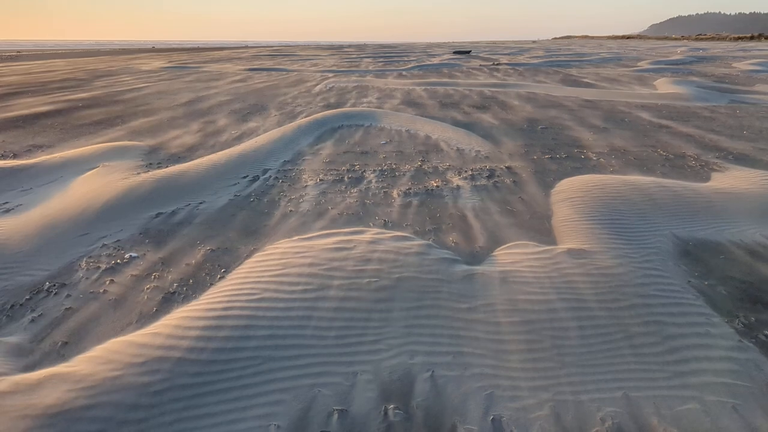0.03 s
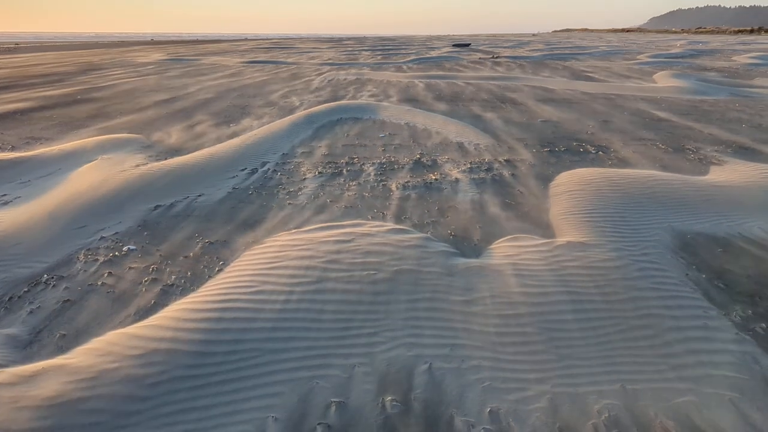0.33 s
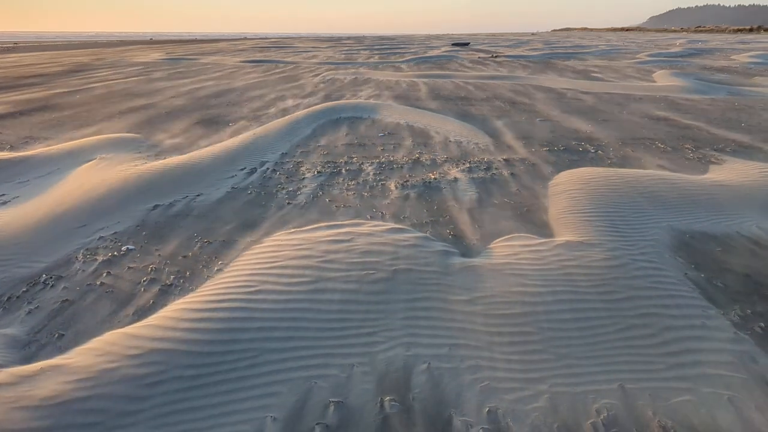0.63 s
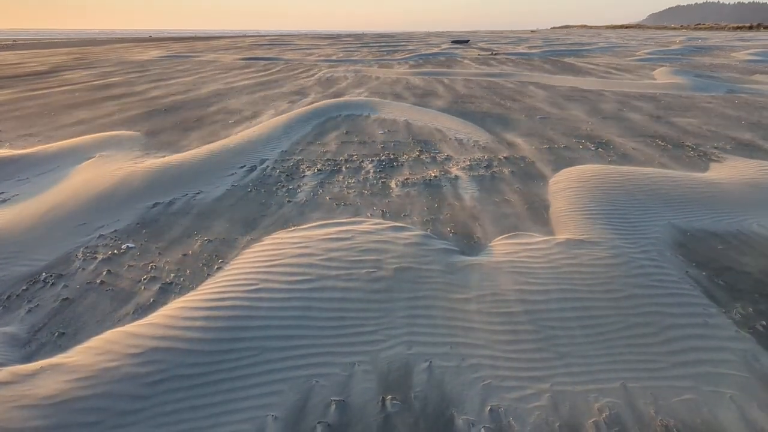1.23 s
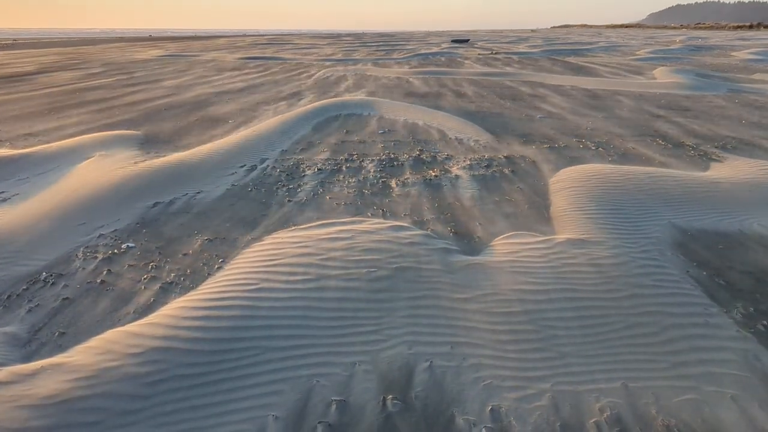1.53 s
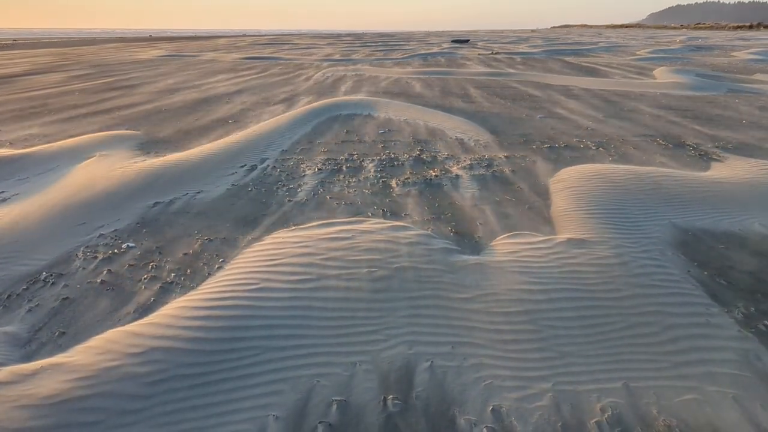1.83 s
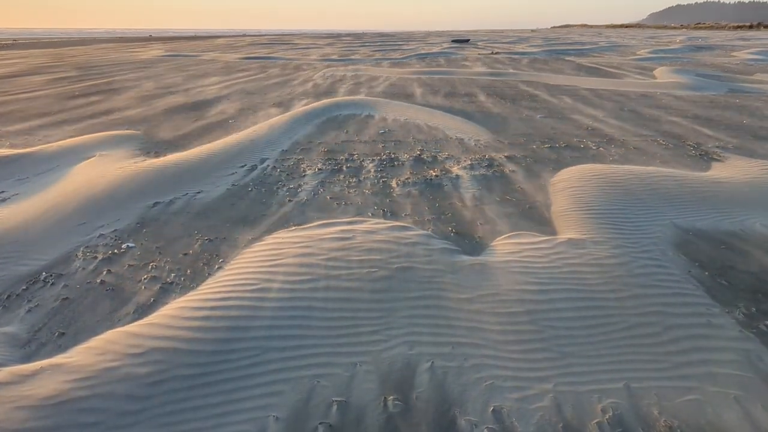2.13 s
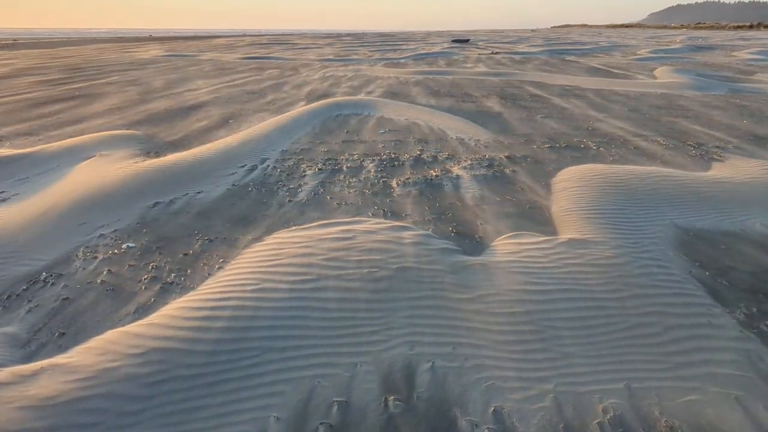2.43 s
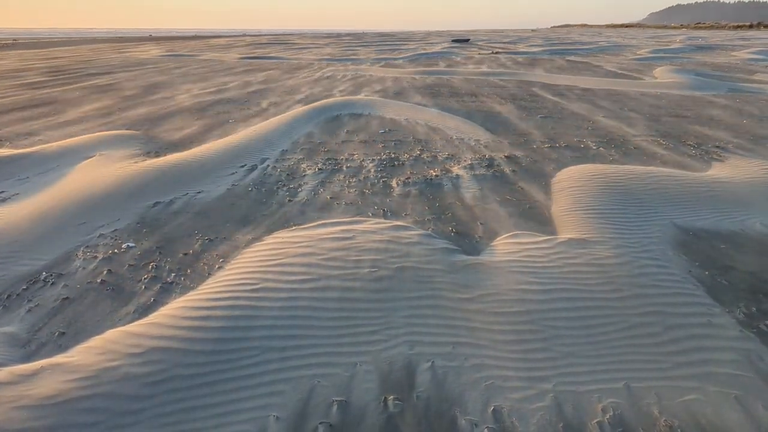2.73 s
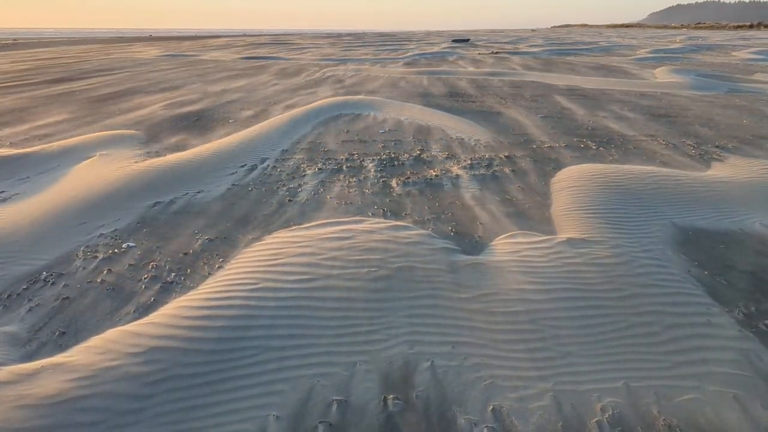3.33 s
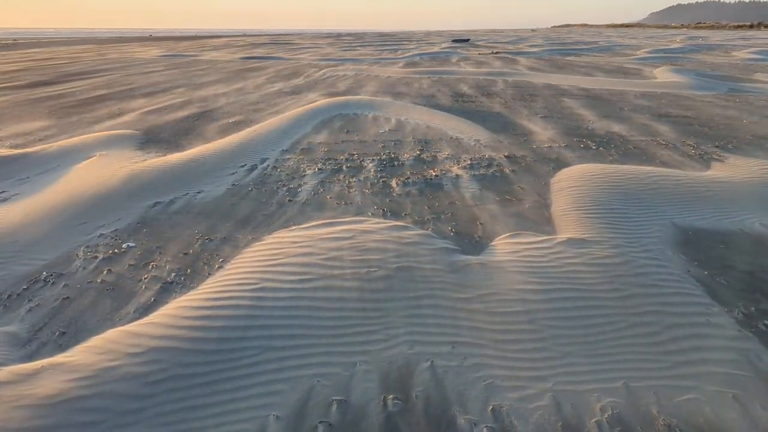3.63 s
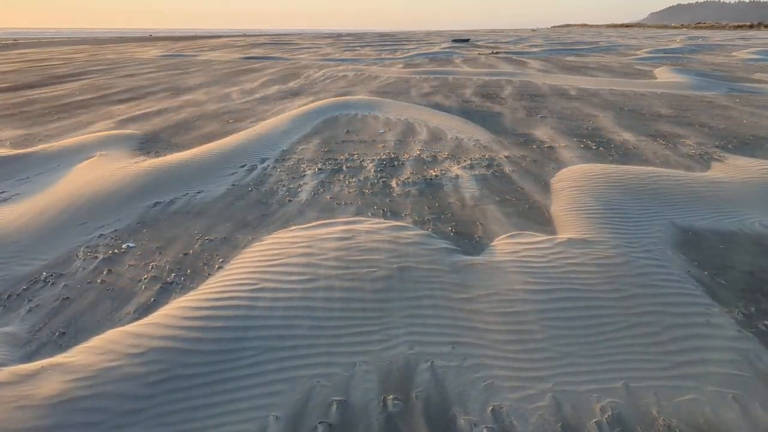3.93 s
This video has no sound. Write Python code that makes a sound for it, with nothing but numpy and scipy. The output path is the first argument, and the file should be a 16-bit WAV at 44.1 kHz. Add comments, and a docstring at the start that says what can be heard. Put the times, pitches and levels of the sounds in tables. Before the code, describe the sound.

Gusty wind rumbles and flutters on the microphone while sand hisses faintly over the dunes.

```python
"""Wind and sand on open dunes

Steady wind crosses the dunes and drives hissing sand along the ground, louder on the right.
A heavy gust thumps the microphone at first; then lighter eddies flutter on each of its two ports,
and the left port pops whenever a sharp eddy breaks right on it."""
import sys
import numpy as np
from scipy import signal
from scipy.fft import rfft, irfft, next_fast_len
from scipy.io import wavfile
from scipy.ndimage import uniform_filter1d, map_coordinates

SR = 44100
rng = np.random.default_rng(int(sys.argv[2]) if len(sys.argv) > 2 else 0)


def store_pcm(level_fs):
    """Save levels as 16-bit WAV."""
    pcm = np.round(np.clip(level_fs, -1, 1) * 32767).astype(np.int16)
    wavfile.write(sys.argv[1], SR, np.atleast_2d(pcm).T)


N = 176400
T = np.arange(N) / SR

# The heavy opening gust on each port. Each row: time in seconds, level in dB.
GUST_LEFT = [(.04, -16.5), (.24, -23), (.36, -16.5), (.43, -24), (.6, -23), (.72, -35), (1, -68)]
GUST_RIGHT = [(.04, -19), (0.11, -16), (.3, -22), (.47, -23), (.62, -35), (1, -67)]
# The eddies on each port. Each row: time in seconds, strength in dB.
EDDIES_LEFT = [(.05, -35), (.34, -28.5), (.57, -33.5), (.72, -40), (.945, -40), (.965, -25.5), (1.03, -33),
               (1.07, -42), (1.26, -43), (1.31, -29), (1.47, -28.5), (1.55, -40), (1.66, -33.5),
               (1.95, -42), (2.25, -36.5), (2.45, -41), (2.9, -42.5), (2.98, -31.5), (3.2, -39), (3.6, -33),
               (3.721, -27), (3.76, -38), (3.81, -29), (3.91, -43), (3.94, -26), (3.97, -40)]
EDDIES_RIGHT = [(.05, -33), (.35, -29.5), (.6, -40), (1, -31), (1.2, -36), (1.75, -34), (1.9, -38),
                (2.05, -33), (2.45, -36.5), (2.8, -30.5), (3.5, -30.3), (4, -33)]
# EQ of the buffeting layers. Each row: frequency in Hz, relative level in dB.
RUMBLE_EQ = [(20, -26), (70, 0), (140, -2), (250, -6), (450, -26), (2000, -100)]
SUB_EQ = [(20, -26), (70, 0), (110, -6), (300, -50), (1500, -120)]
THUD_EQ = [(20, -42), (40, -1), (65, 2), (110, -1), (200, -3.5), (350, -15.5), (800, -63)]
FLUTTER_EQ = [(60, -45), (150, -5.5), (280, -0.5), (450, -3.5), (700, -14), (1100, -24.5), (2000, -31),
              (4000, -52)]
RASP_EQ = [(200, -48), (500, 3.5), (800, 1.5), (1300, -7.5), (2000, -14.5), (2800, -26), (4000, -64)]
# Eddies breaking on the left port; the first two rows are the low opening thump. Each row: centre in seconds,
# relative level in dB, pitch in Hz.
POPS = [(0.045, -10, 226), (0.049, -4, 182), (0.3787, -7, 1040), (0.421, -13, 675), (0.489, -12.5, 250),
        (0.514, -13.5, 388), (0.9642, -12, 428), (0.9715, -15, 840), (0.9751, -11, 257),
        (0.9852, -13.5, 910), (1.0135, -28, 730), (1.0193, -20.5, 1050), (1.29, -17, 586),
        (1.2984, -7.5, 1020), (1.305, -13, 980), (1.3134, -14, 790), (1.3511, -6, 1030),
        (1.3575, -2.5, 990), (1.3795, -23, 850), (1.4026, -10, 1190), (1.421, -14.5, 1110),
        (1.4469, -17.5, 960), (1.517, -4.5, 1270), (1.6677, -4, 1050), (1.904, -14, 1130), (2.17, -15, 756),
        (2.2912, -19, 930), (2.525, -19, 530), (3.2327, -11.5, 1340), (3.6266, -21.5, 825),
        (3.6704, -14.5, 334), (3.709, -12.5, 850), (3.7105, -12.5, 222), (3.7268, -12, 666),
        (3.7345, -9, 850), (3.8139, -4, 860), (3.8147, 0, 1240), (3.8235, -8, 1280), (3.9078, -26, 750),
        (3.934, -17, 504), (3.9405, -27, 300)]
# Fader rides for open wind, sand hiss and sand fizz. Each row: time in seconds, level in dB before trim.
AIR_RIDE = [(0.08, -56), (0.67, -58), (1.19, -54), (1.91, -52), (2.4, -53), (3.26, -49), (3.52, -53.5)]
HISS_RIDE = [(0.08, -84), (0.36, -68), (0.95, -67), (0.99, -61), (1.14, -65.5), (2.05, -63), (2.6, -63.5),
             (2.72, -60.5), (3.55, -59), (3.59, -64), (4.0, -58.5)]
FIZZ_RIDE = [(0.08, -97), (0.45, -73), (0.78, -63.5), (0.8, -73), (0.96, -69), (1.03, -61), (1.1, -69),
             (1.39, -65.5), (2.02, -64), (2.13, -70), (3.32, -65), (3.42, -67), (4.0, -63.5)]
# EQ of those three beds on each side. Each row: frequency in Hz, relative level in dB.
AIR_EQ_LEFT = [(100, 4), (400, -29), (1000, -5.5), (1600, -8), (2400, -9), (3200, -17.5), (4200, -21.5),
               (6000, -29), (12000, -55)]
AIR_EQ_RIGHT = [(100, 6), (400, -5.5), (1000, 2.5), (1600, -2.5), (2400, 3.5), (3200, -8), (4200, -18),
                (6000, -53), (12000, -60)]
HISS_EQ_LEFT = [(1500, -4), (4000, 4.5), (5300, -7), (6600, 3), (8000, -8), (10000, -31)]
HISS_EQ_RIGHT = [(1500, 2.5), (4000, 2.5), (5300, -1.5), (6500, 4.5), (7200, 3.5), (8000, -8.5),
                 (10000, -35)]
FIZZ_EQ_LEFT = [(4000, -13), (8000, -5), (10300, 0), (12000, -6), (13800, -25), (14800, -20), (15700, -16)]
FIZZ_EQ_RIGHT = [(4000, -7), (8000, -3), (10000, -1), (12000, -3.5), (13000, -6), (13900, -20),
                 (14700, -11.5), (15700, -16)]

TYPICAL_EDDY_DB = -33
THUD_DB, FLUTTER_DB = -34.5, -32.5  # levels at the typical eddy strength
THUD_GROWTH, RASP_GROWTH = 0.49, 1.95  # dB per dB of eddy strength
SUB_GROWTH, RASP_DUCK = 1.6, 0.89  # dB per dB of gust
POP_WIDTH_CYCLES, POP_LEAN_RAD, POP_SCATTER_RAD = 0.33, 0.6, 0.9
EDGE_S, PUSH_S = 0.000105, 0.00089  # widths of a pop's steep edge and slow push
START_S, FADE_S, BED_FADE_S = 0.037, 0.012, 0.035
HIGH_CUT_HZ = 15720


def gust(gust_db, sub_peak_db):
    """A heavy gust presses on one port: lumpy rumble, with sub bass swelling at its height."""
    rumble = amp(gust_db) * turbulence(RUMBLE_EQ, lump_db=3.0, lumps_per_s=26.55)
    sub_db = sub_peak_db + SUB_GROWTH * (gust_db - gust_db.max())
    return rumble + amp(sub_db) * coloured(rng.standard_normal(N), SUB_EQ)


def eddies(ride, gust_db, rasp_db, grains_per_s):
    """Eddies buffet one port: thud, flutter and rasp, brighter as they strengthen. The gust ducks the rasp."""
    strength_db = curve(ride) - TYPICAL_EDDY_DB + 0.9 * wobble(21)
    duck_db = RASP_DUCK * np.maximum(gust_db - TYPICAL_EDDY_DB, 0)
    thud = amp(THUD_DB + THUD_GROWTH * strength_db) * turbulence(THUD_EQ, lump_db=2.5, lumps_per_s=22)
    flutter = amp(FLUTTER_DB + strength_db) * turbulence(FLUTTER_EQ, lump_db=3.0, lumps_per_s=70)
    rasp = amp(rasp_db + RASP_GROWTH * strength_db - duck_db) * crackle(grains_per_s)
    return thud + flutter + rasp


def crackle(grains_per_s):
    """Tiny eddies of uneven size break at random moments."""
    sizes = rng.standard_normal(N) * amp(3 * rng.standard_normal(N))
    breaks = rng.random(N) < grains_per_s / SR
    return coloured(breaks * sizes, RASP_EQ)


def pops():
    """A breaking eddy, or the opening thump: brief suction snaps back to pressure on a steep edge, inside a
    slower push of air."""
    left = np.zeros(N)
    for centre_s, db, hz in POPS:
        t = T - centre_s
        cycles, slow, fast = t * hz, t / PUSH_S, t / EDGE_S
        phase = 2 * np.pi * cycles + POP_LEAN_RAD + POP_SCATTER_RAD * rng.standard_normal()
        swing = -np.cos(phase) * np.exp(-.5 * (cycles / POP_WIDTH_CYCLES) ** 2)
        edge = hz * EDGE_S * fast * np.exp(-.5 * fast ** 2)  # higher pops bite harder
        push = slow * np.exp(-.5 * slow ** 2) * rng.standard_normal()
        gain = amp(min(db + 1, -0.9))
        left += gain * (swing + amp(2.5) * edge + amp(-17.5) * push)
    return np.array([left, amp(-28) * left])  # faint bleed to the right


def open_wind():
    """Air rushes evenly over the dunes."""
    level_db = curve(AIR_RIDE) + 0.17 * wobble(10)
    return bed(level_db, (AIR_EQ_LEFT, AIR_EQ_RIGHT), trims_db=(4, 8.5), patch_db=1.0)


def sand():
    """Countless grains merge into a hiss and a finer fizz that shiver together with each sand streamer."""
    shiver_db = 0.29 * wobble(21.9)
    hiss_db = curve(HISS_RIDE) + shiver_db
    fizz_db = curve(FIZZ_RIDE) + shiver_db
    hiss = bed(hiss_db, (HISS_EQ_LEFT, HISS_EQ_RIGHT), trims_db=(-5.5, 6.5), patch_db=1.95)
    fizz = bed(fizz_db, (FIZZ_EQ_LEFT, FIZZ_EQ_RIGHT), trims_db=(0.5, 5), patch_db=1.95)
    return hiss + fizz


def bed(level_db, eqs, trims_db, patch_db):
    """A wide noise bed: left and right each get their own noise, EQ and trim."""
    return np.array([amp(level_db + trim) * coloured(patchy(patch_db), eq)
                     for eq, trim in zip(eqs, trims_db)])


def patchy(depth_db):
    """White noise with random patches of gain across time and frequency."""
    spectrum = signal.stft(rng.standard_normal(N), nperseg=512)[2]
    patches = uniform_filter1d(rng.standard_normal(spectrum.shape), size=8, axis=0)
    patches = uniform_filter1d(patches, size=16, axis=1)
    return signal.istft(spectrum * amp(depth_db * unit(patches)), nperseg=512)[1][:N]


def turbulence(eq, lump_db, lumps_per_s):
    """Pressure noise that comes in lumps."""
    return coloured(rng.standard_normal(N) * amp(lump_db * wobble(lumps_per_s)), eq)


def coloured(x, eq):
    """x through an EQ curve, at rms 1."""
    knots_hz, db = np.transpose(eq)
    return unit(filtered(x, lambda hz: amp(np.interp(np.log(hz + 1), np.log(knots_hz + 1), db))))


def filtered(x, response):
    """x through a frequency response."""
    size = next_fast_len(N + SR // 2)
    return irfft(rfft(x, size) * response(np.fft.rfftfreq(size, 1 / SR)), size)[..., :N]


def wobble(rate):
    """Smooth random modulation, rate knots a second."""
    return map_coordinates(rng.standard_normal(4096), [T * rate + 2], mode="wrap")


def curve(rows):
    """Timed points joined into one value per sample."""
    return np.interp(T, *np.transpose(rows))


def amp(db):
    """Decibels to gain."""
    return 10 ** (np.asarray(db) / 20)


def unit(x):
    """Scale to rms 1."""
    return x / np.sqrt(np.mean(x ** 2) + 1e-20)


def fade_in(seconds):
    """A straight fade up from START_S."""
    return np.clip((T - START_S) / seconds, 0, 1)


def scene():
    """Buffeting and pops up close, with wind and sand fading in behind."""
    left_db, right_db = curve(GUST_LEFT), curve(GUST_RIGHT)
    left = gust(left_db, sub_peak_db=-19)
    left += eddies(EDDIES_LEFT, left_db, rasp_db=-44.5, grains_per_s=420)
    right = gust(right_db, sub_peak_db=-14.5)
    right += eddies(EDDIES_RIGHT, right_db, rasp_db=-43.5, grains_per_s=2500)
    background = fade_in(BED_FADE_S) * (open_wind() + sand())
    return np.array([left, right]) + pops() + background


def record(dry):
    """A quick fade-in and a brick-wall high cut on the whole mix."""
    return filtered(dry * fade_in(FADE_S), lambda hz: hz < HIGH_CUT_HZ)


dry = scene()
out = record(dry)
store_pcm(out)
```